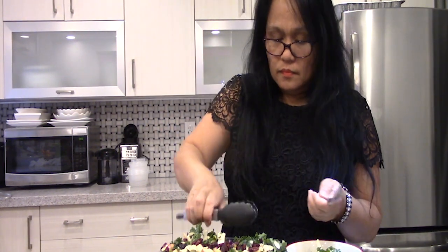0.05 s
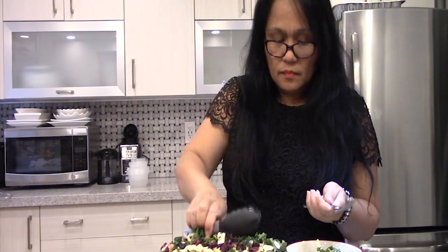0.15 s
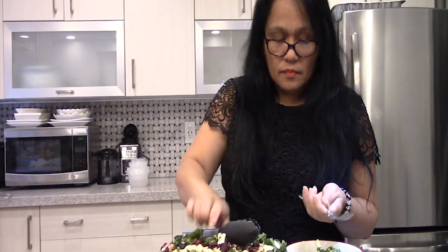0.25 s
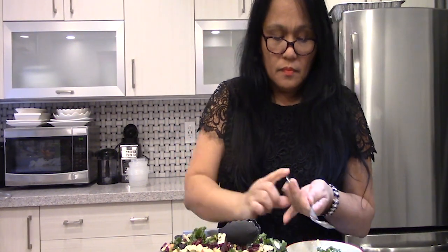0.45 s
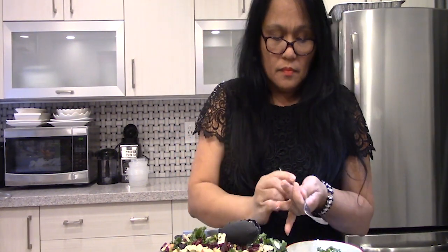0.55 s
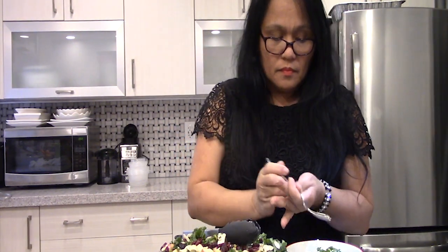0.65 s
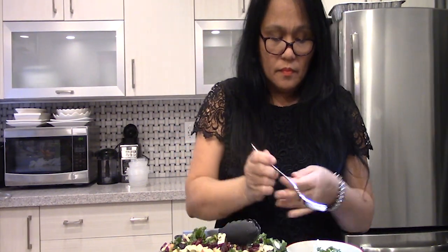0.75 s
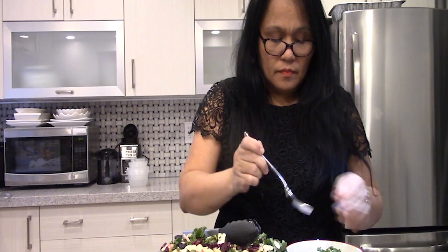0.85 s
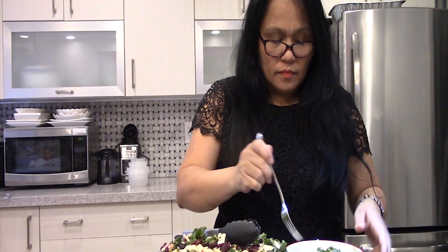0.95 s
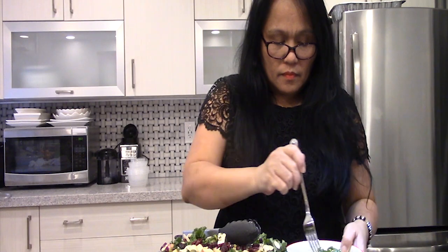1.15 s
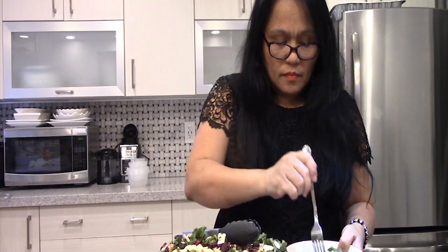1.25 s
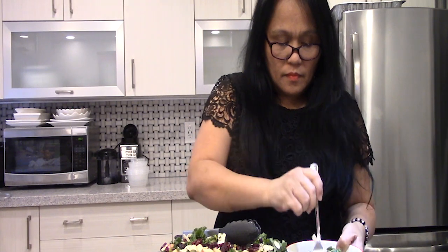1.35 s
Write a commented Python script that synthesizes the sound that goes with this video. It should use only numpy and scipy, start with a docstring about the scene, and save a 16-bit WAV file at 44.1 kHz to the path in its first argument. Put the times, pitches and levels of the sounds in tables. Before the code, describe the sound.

A utensil clinks sharply on a dish, then a fork knocks softly on a bowl.

```python
"""A serving utensil is set down on a dish in a hard-walled kitchen: a sharp clack, a brief chatter,
and the free vibration of dish and utensil rings on. A fork scuffs and ticks faintly as it is lowered,
then knocks once on a bowl whose contents damp its modes. The room answers clack and knock with
reverberation, over the quiet fan noise and hum of an appliance."""
import sys
import numpy as np
from scipy import signal
from scipy.fft import rfft, irfft
from scipy.io import wavfile
from scipy.ndimage import uniform_filter1d, minimum_filter1d

SR = 44100
rng = np.random.default_rng(int(sys.argv[2]) if len(sys.argv) > 2 else 0)


def pcm_store(signal):
    """Save signal as 16-bit PCM."""
    levels = np.round(np.clip(np.atleast_2d(signal), -1, 1) * 32767)
    wavfile.write(sys.argv[1], SR, levels.astype(np.int16).T)


N = 61739


def dish(room):
    """Impact excitation: the utensil rebounds on the dish, whose normal modes ring with the room."""
    # Each row: start in seconds, relative level in dB, contact time in milliseconds.
    contacts = [(0.2348, -3, 0.75), (0.2359, 0.5, 0.042), (0.237, -5, 0.037), (0.258, -9, 0.069),
                (0.272, -9.5, 0.23)]
    # Lasting modes of dish and utensil, then the mostly short-lived modes of the clack.
    # Each row: frequency in Hz, relative level in dB, time to decay by 60 dB in seconds.
    ringing_modes = [(370, -33, .38), (458, -22.5, .27), (980, -28, .34), (1082, -23, .5), (1588, -21, .48),
                     (1620, -17.5, .54), (1813, -27, .45), (2168, -22, .36), (2195, -19.5, .53),
                     (2205, -26, .57), (2858, -27.5, .53), (3685, -31, .56), (4624, -19, .36),
                     (4626, -35, .7), (5365, -25.5, .39), (5678, -27, .56), (6222, -28.5, .33),
                     (6821, -35, .36), (7273, -37, .41), (7899, -35, .35), (8108, -35, .43),
                     (8759, -46, .42), (9819, -41, .33), (10950, -36, .33), (11250, -39, .32)]
    clack_modes = [(369.4, -29, 0.37), (530, -20.5, 0.034), (1102, -9.5, 0.052), (1307, -18.5, .08),
                   (1564, -4, 0.063), (2060, -12.5, .07)]
    # Spectra of the contact noise with its echo, then of the bright snap of a hard contact.
    # Each row: frequency in Hz, relative spectral density in dB.
    body_spectrum = [(40, -36), (90, -41), (135, -18.5), (185, -21.5), (240, -9), (305, -18), (450, -3.5),
                     (680, -7), (1050, 1.5), (1380, -5.5), (1600, 2.5), (1950, -8.5), (2170, 0.5),
                     (2450, -17.5), (2850, -12.5), (3200, -22), (4500, -13.5), (5600, -10.5), (7000, -17),
                     (9000, -23), (10400, -29), (11200, -23.5), (12000, -41.5)]
    snap_spectrum = [(500, -45), (3200, -12), (5500, 0.5), (7500, -2), (11500, -5.5)]
    chatter = 0
    for start, db, contact_ms in contacts:
        body = undb(12) * contact_noise(body_spectrum, t60=.05)
        snap = undb(-1.5) * contact_noise(snap_spectrum, t60=.02)
        chatter += undb(db) * delay(soften(body + snap, contact_ms), start)
    tone = undb(.8) * ring(ringing_modes) + ring(clack_modes)
    reverberation = undb(16.3) * unit_energy(colour(room, body_spectrum))
    return chatter + delay(tone + reverberation, seconds=.2345)


def bowl(room):
    """Damped vibration: the fork knocks once on a bowl whose contents absorb the ringing."""
    # Each row: frequency of a mode in Hz, relative level in dB, time to decay by 60 dB in seconds.
    modes = [(369, -36, .34), (456, -38, .38), (644, -34, .21), (940, -38, .13), (1008, -37, .14),
             (1184, -35, .2), (1287, -35, .24), (1695, -26, .16), (2129, -42, .27), (2456, -31, .16),
             (2708, -44, .2), (2930, -45, .45), (3725, -54, .5), (4002, -40.5, .31), (4678, -48, .43),
             (5722, -46, .13), (6072, -43, .1), (6245, -44, .11), (7270, -55, .19), (8753, -55, .15),
             (9950, -60, .16)]
    # The knock and its echo. Each row: frequency in Hz, relative spectral density in dB.
    spectrum = [(40, -38), (100, -21), (200, -8.5), (380, -6.5), (800, -7.5), (1250, -1.5), (1680, -4.5),
                (1950, -19), (2480, -7), (2950, -16.5), (3400, -23.5), (4100, -9), (5100, -28),
                (6200, -15.5), (8500, -31), (12000, -38)]
    knock = undb(-1.5) * contact_noise(spectrum, t60=.057)
    tone = undb(-1) * ring(modes)
    reverberation = undb(-6.5) * unit_energy(colour(room, spectrum))
    return delay(knock + tone + reverberation, seconds=1.3208)


def fork():
    """Friction and light impacts: the handled fork gives a dry scuff and tiny metallic ticks."""
    # Each row: frequency in Hz, relative spectral density in dB.
    scuff_spectrum = [(200, -18), (1500, 13), (2600, -8), (4400, 0), (6000, -17), (12000, -29)]
    # Each row: start in seconds, frequency in Hz, level in dB, time to decay by 60 dB in seconds.
    ticks = [(1.112, 2630, -52, 0.058), (1.112, 3750, -59, 0.055), (1.243, 3950, -65, 0.29),
             (1.268, 6020, -68, .15)]
    scuff = undb(-31) * delay(contact_noise(scuff_spectrum, t60=.067), seconds=1.109)
    return scuff + sum(delay(ring([(hz, db, t60)]), start) for start, hz, db, t60 in ticks)


def ring(modes, attack_s=.0007, flutter_s=.016):
    """Modal superposition: one blow starts decaying sines, which flutter as echoes interfere."""
    t = clock()
    echo_share = .45 * (1 - np.exp(-t / flutter_s))
    direct_share = np.sqrt(1 - echo_share ** 2)
    tone = 0
    for hz, db, t60 in modes:
        echoes = (waver(flutter_s) + 1j * waver(flutter_s)) / np.sqrt(2)
        phasor = np.exp(2j * np.pi * (hz * t + rng.random()))
        tone += undb(db) * decay(t60) * np.imag(phasor * (direct_share + echo_share * echoes))
    return tone * (1 - np.exp(-t / attack_s))


def contact_noise(spectrum, t60):
    """Modal overlap: crowded, heavily damped vibrations merge into a burst of noise."""
    return unit_energy(colour(rng.standard_normal(N) * decay(t60), spectrum))


def soften(x, contact_ms):
    """Time-bandwidth reciprocity: the longer a contact lasts, the less treble it excites."""
    cutoff_hz = min(1000 / contact_ms, .45 * SR)
    return signal.sosfilt(signal.butter(4, cutoff_hz, fs=SR, output="sos"), x)


def kitchen(bands=9, build_s=.005):
    """Diffuse reverberation: the room's echoes build up quickly and die soonest in the top treble."""
    # Each row: frequency in Hz, reverberation time (60 dB of decay) in seconds.
    decay_times = [(120, 0.32), (400, .47), (1200, 0.48), (3000, 0.69), (6000, 0.55), (11000, 0.11)]
    noise_spectrum = rfft(rng.standard_normal(N))
    hz = np.fft.rfftfreq(N, 1 / SR)
    centres = np.geomspace(80, 14000, bands)
    tail = 0
    for centre, weights in zip(centres, np.eye(bands)):
        triangular_band = lookup(hz, list(zip(centres, weights)))
        tail += irfft(noise_spectrum * triangular_band, N) * decay(lookup(centre, decay_times))
    onset = 1 - np.exp(-clock() / build_s)
    return unit_energy(delay(tail * onset, seconds=.004))


def appliance(waver_s=.13):
    """Broadband and tonal noise: a steady fan, and hum lines that waver in phase and amplitude."""
    # Each row: frequency in Hz, relative spectral density in dB.
    fan_spectrum = [(18, -61), (30, -46), (74, -26), (165, -7), (217, -11), (259, -5.5), (350, -10),
                    (428, -7.5), (689, -13.5), (761, -11), (1050, -16.5), (1360, -10.5), (1790, -22),
                    (2670, -25.5), (2870, -27.5), (3790, -28.5), (12000, -42), (15600, -64), (22000, -120)]
    # Each row: frequency in Hz, RMS level in dB before the wavering.
    hum_lines = [(274.5, -75.5), (430.7, -64), (1340, -69)]
    fan = colour(rng.standard_normal(N), fan_spectrum)
    hum = 0
    for hz, db in hum_lines:
        line = np.sqrt(2) * np.sin(2 * np.pi * hz * clock() + waver(waver_s))
        hum += undb(db) * line * (1 + .31 * waver(waver_s))
    return undb(-54) * fan / fan.std() + hum


def waver(seconds):
    """Low-pass noise: two moving averages leave a slow random motion of unit standard deviation."""
    size = int(seconds * SR)
    motion = uniform_filter1d(rng.standard_normal(N), size, mode="wrap")
    motion = uniform_filter1d(motion, size, mode="wrap")
    return motion / motion.std()


def colour(x, spectrum, size=4096):
    """Minimum-phase filtering: a causal response follows the given (Hz, dB) points."""
    magnitude = undb(lookup(np.fft.rfftfreq(size, 1 / SR), spectrum))
    cepstrum = irfft(np.log(magnitude))
    # Folding the cepstrum onto positive time makes the filter causal.
    cepstrum[1:size // 2] *= 2
    cepstrum[size // 2 + 1:] = 0
    response = irfft(np.exp(rfft(cepstrum)))
    return signal.fftconvolve(x, response)[:N]


def lookup(hz, points):
    """Interpolation of (Hz, value) points on a logarithmic frequency axis."""
    frequencies, values = np.array(points).T
    return np.interp(np.log(np.maximum(hz, 1)), np.log(frequencies), values)


def decay(t60):
    """Exponential decay by 60 dB in t60 seconds."""
    return np.exp(-np.log(1000) * clock() / t60)


def delay(x, seconds):
    """Time shift within the length of the scene."""
    return np.concatenate([np.zeros(int(seconds * SR)), x])[:N]


def unit_energy(x):
    """Normalisation to a sum of squares of one."""
    return x / np.sqrt(np.sum(x ** 2))


def undb(db):
    """Amplitude ratio of a level in decibels."""
    return 10 ** (np.asarray(db) / 20)


def clock():
    """Time of every sample in seconds."""
    return np.arange(N) / SR


def scene():
    """Superposition in one channel; dish and bowl each excite the room from their own place."""
    return (dish(kitchen()) + fork() + bowl(kitchen()) + appliance())[None]


def record(dry, ceiling=.95, limiter_s=.0015, bass_hz=30, top_hz=11700):
    """Peak and band limiting: the gain dips at the loudest peaks; deep bass and top treble are cut."""
    size = int(limiter_s * SR)
    needed_gain = ceiling / np.maximum(np.abs(dry), ceiling)
    gain = uniform_filter1d(minimum_filter1d(needed_gain, size), size)
    high_pass = signal.butter(1, bass_hz, "high", fs=SR, output="sos")
    low_pass = signal.ellip(8, .2, 80, top_hz, fs=SR, output="sos")
    return signal.sosfilt(low_pass, signal.sosfilt(high_pass, dry * gain))


dry = scene()
out = record(dry)
pcm_store(out)
```